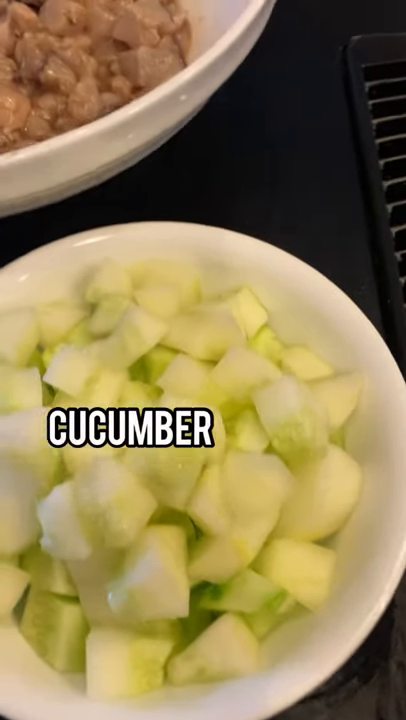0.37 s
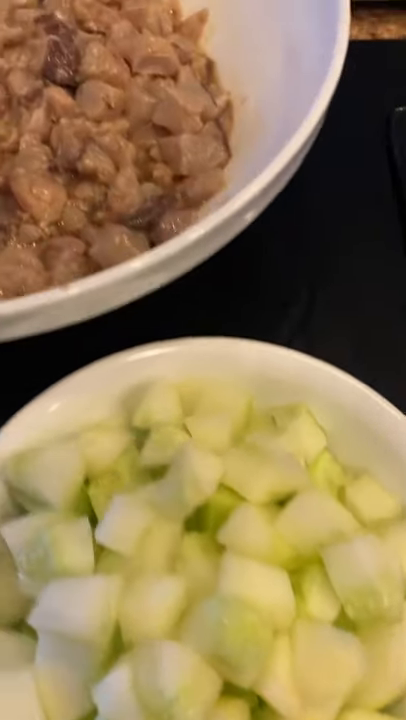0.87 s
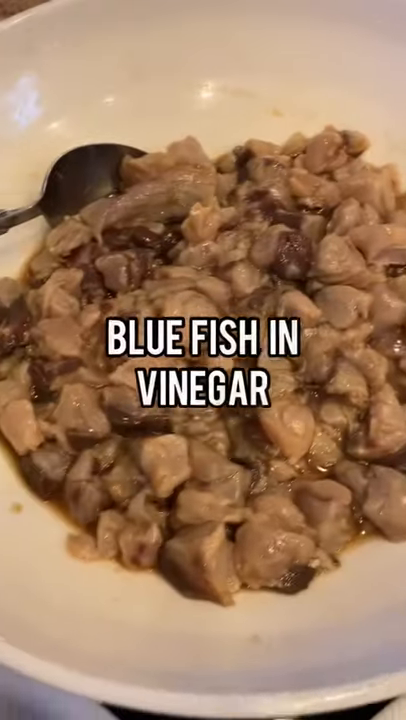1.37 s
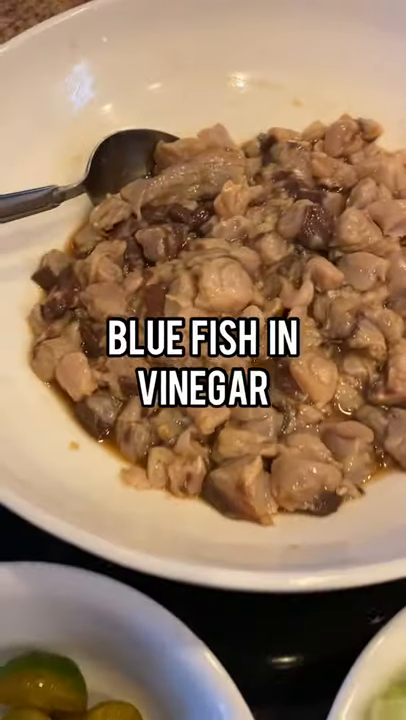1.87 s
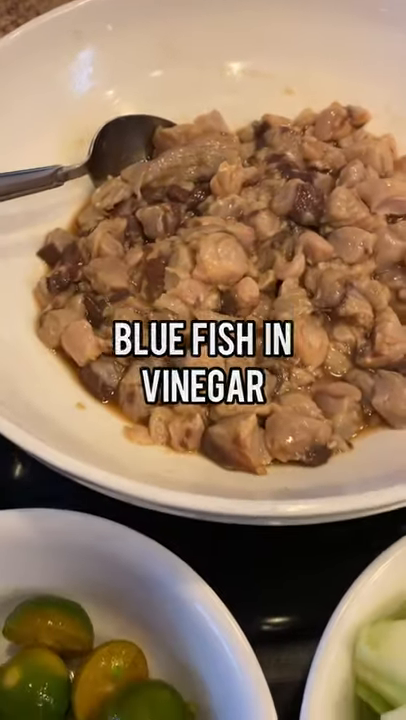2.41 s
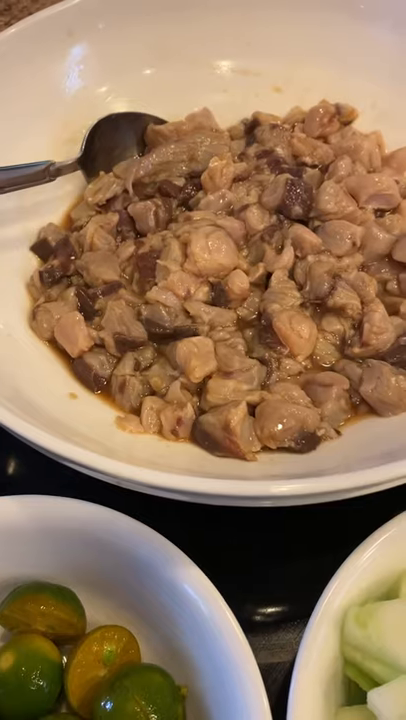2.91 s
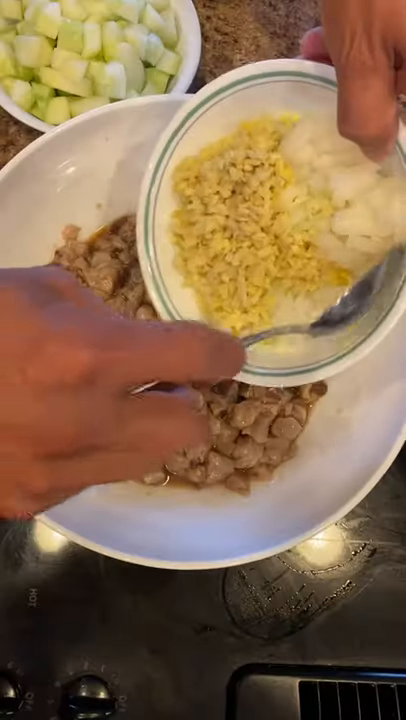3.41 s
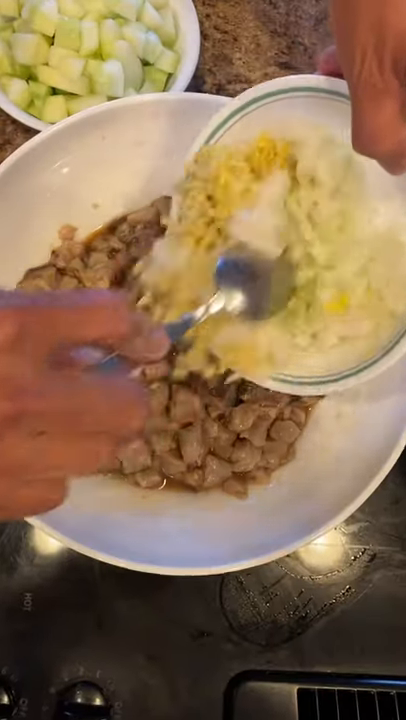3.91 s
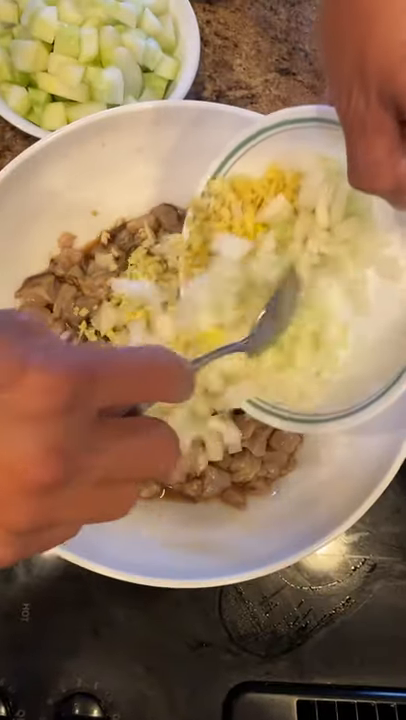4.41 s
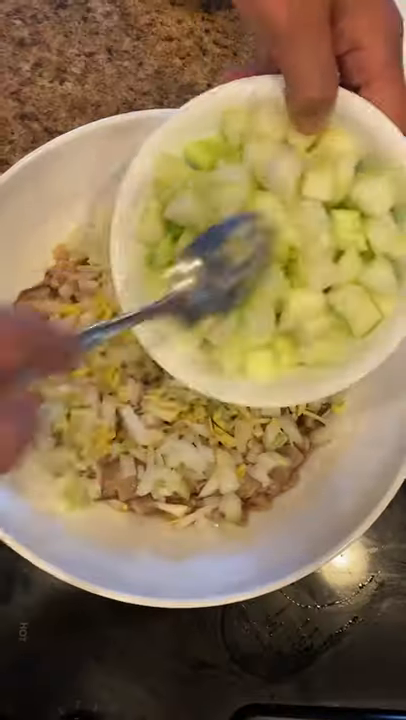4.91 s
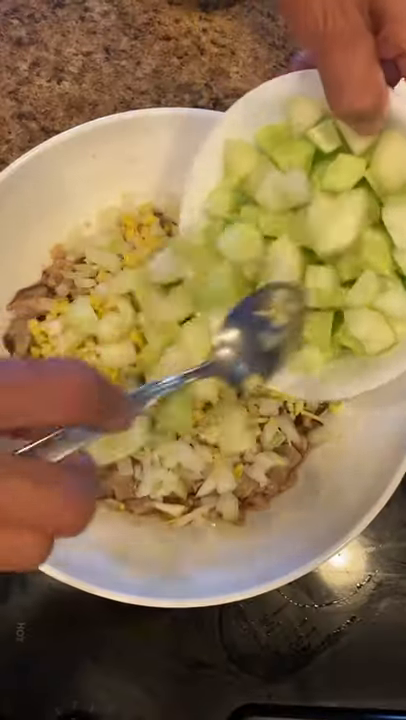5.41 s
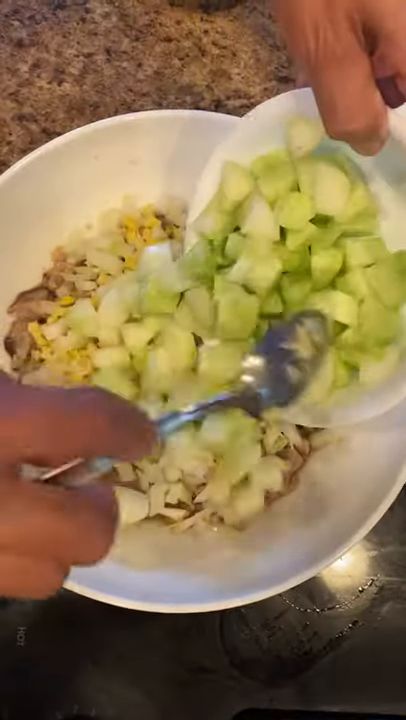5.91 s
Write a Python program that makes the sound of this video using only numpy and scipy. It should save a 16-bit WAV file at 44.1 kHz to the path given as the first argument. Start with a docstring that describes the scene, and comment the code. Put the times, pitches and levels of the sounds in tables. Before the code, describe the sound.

Over a faint constant hum, soft thumps and brushing give way to a few bright, short steel-on-ceramic clacks amid fine wet crackling.

```python
"""A steel spoon knocks a hand-held dish, ringing its many pitches, and bits of food tick as short noise bursts.
This is a quiet kitchen in four joined shots, with a mains buzz of many overtones over noisy room rumble.
Early on come a step of low ringing bumps, a squeak of wavering high tones and a shuffle of grainy noise.
Two microphone ports a few centimetres apart pick it all up."""
import sys
import numpy as np
from scipy import signal
from scipy.fft import rfft, irfft
from scipy.io import wavfile
from scipy.ndimage import uniform_filter1d

SR = 44100
rng = np.random.default_rng(int(sys.argv[2]) if len(sys.argv) > 2 else 0)


def transcribe(u):
    """Save the signal u as a 16-bit wav file named by the first command-line argument.

    u: samples, shape (n,) or (channels, n), limited to [-1, 1]; the rate is SR.
    q: integer samples, one column per channel.
    """
    v = np.clip(np.atleast_2d(u).T, -1, 1)
    q = np.round(v * 32767).astype(np.int16)
    wavfile.write(sys.argv[1], SR, q)


N = 266364
HZ, T = np.fft.rfftfreq(N, 1 / SR), np.arange(N) / SR

# The joined shots. Each row: start in seconds, then changes to the rumble, air and treble in dB,
# and the average number of crackles per second.
SHOTS = [(0, 1, 0.74, 3.5, 1), (1.034, 0, .13, 6, 1), (3.025, .11, 1.5, 6, 42.5), (4.91, -1.3, -0.4, 6, 46)]
# Where each shot stands: 0 is by the counter, 1 and 2 are over the bowl.
SHOT_PLACES = [0, 0, 1, 2]
# Mains overtones that stand out. Each row: multiple of the mains pitch, then level in dB at places 0, 1, 2.
STRONG_OVERTONES = [(10, -70, -65, -67), (13, -85, -79, -79), (17, -85, -79, -83), (19, -70, -70, -73),
                    (20, -76, -83, -84), (22, -75, -89, -94), (24, -76, -77, -78), (26, -79, -81, -82),
                    (27, -78, -87, -88), (30, -82, -80, -82), (31, -78, -84, -87), (32, -76, -81, -84),
                    (42, -77, -87, -93), (44, -75, -91, -93), (46, -86, -78, -86), (51, -81, -84, -89),
                    (54, -78, -81, -96), (58, -86, -81, -83), (71, -80, -80, -81), (85, -82, -80, -84),
                    (87, -79, -80, -79), (89, -82, -84, -83), (94, -91, -79, -86), (109, -81, -92, -92)]
# Basic level of each weak overtone. Each row: frequency in Hz, level in dB.
WEAK_OVERTONES = [(400, -88.5), (1300, -89.5), (2500, -86), (4000, -89), (4600, -93.5), (6000, -89),
                  (7000, -100), (8300, -104), (13000, -112)]
# Change to the weak overtones at places 0, 1, 2, in dB.
WEAK_PLACE_DB = [-2.5, -2.5, -5]
# Resonances that lift the weak overtones. Each row: centre in Hz, width in Hz, lift in dB.
HOUSING = [(1810, 110, 20), (3360, 240, 4.5), (5400, 280, 10.5), (6410, 360, 8), (9500, 195, 4),
           (10300, 500, 1)]
# Room and motor boom. Each row: centre in Hz, width in Hz, relative strength in dB.
RUMBLE_PEAKS = [(56.6, 6.3, 1), (68, 31, -8.5), (122.5, 13.6, -4), (187.6, 4.5, 2), (232.4, 87, -7)]
# Colour of the air noise. Each row: frequency in Hz, relative level per Hz in dB.
AIR_COLOUR = [(40, -30.5), (60, -2), (150, -1.5), (300, -3), (700, -7), (1500, -15), (3000, -22.5),
              (5300, -21.5), (6600, -25.5), (7100, -44), (8000, -42), (8600, -31.5), (10000, -31.5),
              (13000, -38.5), (15600, -46.5), (16400, -67)]
# Small dry ticks. Each row: start in seconds, peak level in dB, rough centre in Hz.
TICKS = [(.205, -49, 5140), (.2155, -47, 8000), (1.193, -43.5, 3550), (1.918, -39.5, 5000),
         (3.751, -44, 875), (3.830, -44.5, 11400), (3.852, -46.5, 9000), (4.024, -51, 11100),
         (4.202, -45, 10000), (4.763, -43, 9600), (5.022, -51, 11000), (5.044, -50, 7600),
         (5.168, -45, 6660), (5.301, -52, 1520), (5.672, -50, 8100), (5.7235, -50, 10000),
         (5.743, -47, 5160), (5.803, -48, 1010), (5.947, -51, 1660), (6.028, -52, 1290)]
# Brushing strokes. Each row: loudest moment in seconds, level there in dB,
# then seconds to rise and seconds to fall, each over 20 dB.
BRUSH_STROKES = [(0.207, -47.5, 0.008, 0.019), (.236, -53.5, 0.013, .03), (.29, -58.5, 0.076, 0.11),
                 (.45, -65, .1, 0.22), (.825, -59, 0.062, 0.19), (.985, -53, 0.078, 0.14)]
# Colour of the brushing. Each row: frequency in Hz, relative level per Hz in dB.
BRUSH_COLOUR = [(300, 17), (1200, 14), (3000, 8), (6000, 1.5), (11000, 4.5), (15000, -4)]
# Soft low bumps. Each row: start in seconds, peak level in dB, settled pitch in Hz,
# seconds for the main tone to fall 60 dB.
THUDS = [(0.211, -33.5, 120.8, 0.14), (0.299, -43, 69.2, 0.86), (0.497, -51.5, 126, 0.3),
         (0.781, -46.5, 122.7, 0.24), (1.05, -36.5, 126.5, 0.14), (1.919, -45.5, 192, 0.055),
         (4.264, -32, 268, 0.01), (4.579, -25.5, 233, 0.014), (4.86, -44.5, 189, 0.064),
         (5.951, -44.5, 331.5, 0.12)]
# Thin squeaks. Each row: loudest moment in seconds, level there in dB, middle pitch in Hz,
# then seconds to rise and seconds to fall, each over 20 dB.
SQUEAKS = [(.43, -72, 11250, .05, .04), (.485, -57, 10070, .08, 0.05), (.552, -61, 10100, 0.063, .03),
           (.615, -62, 10100, 0.041, 0.056), (.8, -76, 10100, .08, .03), (.445, -68, 14000, .07, .03),
           (.498, -77, 14100, .03, .03)]
# Pitches (modes) of dish and spoon together. Each row: pitch in Hz, seconds to fall 60 dB before damping,
# then relative strength in dB when struck at the rim, at the wall, at the bottom.
DISH_MODES = [(683, 0.03, -32, -25, -18), (1000, 0.04, -31.5, -11.5, -25), (1076, 0.087, -10, 3, 9),
              (1530, .03, -35, -21, -14), (1850, 0.1, -31, -18.5, -12), (1940, 0.16, -14.5, -20, 2),
              (2182, 0.082, -16, -8, -1), (2365, 0.077, -40, -21.5, -10), (2360, 0.085, -13, -3.5, -8),
              (2630, 0.093, -34, -9, -26), (2834, 0.078, -31, -3.5, -11), (3002, 0.34, -12, -5, -35),
              (3130, 0.053, -2.5, -5.5, -17), (3200, 0.095, -32, 7, -32), (3510, 0.064, -30, -2, -11),
              (3680, 0.035, -32, -9.5, 11), (4090, 0.037, -24.5, -10.5, 10), (4456, 0.035, 2.5, -18, -11),
              (4540, .09, -8.5, -18, -15), (4740, .04, -2, -24, -6), (4750, 0.15, 2, -16.5, -14),
              (5133, 0.038, 4.5, -2.5, -14), (5390, .08, -10.5, -12, -28), (5483, 0.014, -17, 8, -8),
              (5650, 0.05, -6, -5, -24), (5684, 0.15, -6, -3, -20), (6240, 0.045, -27, 2.5, -4),
              (6800, 0.11, -8, -10.5, -7), (7600, 0.06, -3, -32, -4), (8170, 0.027, -4, -11.5, -10),
              (9185, 0.066, -11.5, -12, -32), (10000, 0.0304, -33, -16, -1), (9975, 0.096, -14, -25.5, -18),
              (9950, 0.035, -13, -11, -8.5), (9900, 0.13, -9.5, -4, -20), (10400, 0.097, -19, -14, -17.5),
              (10935, 0.063, -8.5, -10, -25), (11230, .09, -14, -26, -28), (11340, .1, -7, -24, -31),
              (12200, 0.043, -14, -15, -31), (12830, .04, -19, -8, -23.5), (13400, 0.064, -3, -9, -19),
              (14300, 0.034, -12, -7, -23)]
# Spoon on dish. Each row: start in seconds, level of the first 10 ms in dB before the bass is cut,
# spot (0 is the rim, 1 the wall, 2 the bottom), brightness in dB per octave.
KNOCKS = [(3.3655, -20, 0.045, 1.5), (3.568, -45.5, 0.071, -2), (3.599, -48, 0.42, -1),
          (3.6224, -51, 1.08, -1), (3.72, -60, 0.36, 0), (3.962, -58.5, 0.13, -4),
          (4.2644, -19, 1.216, 1.7), (4.579, -16.5, 1.503, 2.2)]
# How long the room rings. Each row: frequency in Hz, seconds to fall 60 dB.
ROOM_RING = [(200, 0.375), (1000, 0.36), (3000, 0.48), (6000, 0.41), (12000, 0.32)]
# Colour of the room's answer. Each row: frequency in Hz, relative level in dB.
ROOM_COLOUR = [(300, 4), (1000, 0), (2700, 3), (6000, -4.5), (10500, 0.5), (15000, -4)]
# How far the left port is ahead. Each row: frequency in Hz, lead in radians.
PORT_LEAD = [(0, 0), (1810, 0.1), (2500, 1.2), (3270, 0.4), (4130, 1.0), (5170, 0.4), (9130, 5.3),
             (11500, 6.8), (12400, 8.5), (14400, 10.6), (15300, 12.6)]
# Level difference of the ports. Each row: frequency in Hz, left minus right in dB.
PORT_TILT = [(60, -1.0), (150, -3.5), (380, -5.0), (950, -1.0), (2380, -1.0), (5980, 0.5), (15000, 0.0)]
# Diffuse sound at the ports. Each row: frequency in Hz, likeness of the two ports (1 is the same).
PORT_LIKENESS = [(60, 1), (300, 0.92), (640, 0.077), (1400, 0.27), (3000, 0.33), (8000, 1), (15000, 0.93)]

IN_FIRST_SHOT = T < SHOTS[1][0]
MAINS_HZ = 59.98
FIRST_BUZZ_DB = -2  # the buzz is a little softer in the first shot
SCATTER_DB = 5  # random spread of the weak overtones
DRIFT_S = 2  # seconds in which the weak overtones change over
RUMBLE_DB, AIR_DB = -57.5, -61.5  # before the changes of each shot
BURST_SAMPLES = 800  # length of a noise burst
TICK_MS, TICK_CYCLES = 0.85, 4.5  # a tick dies over a short moment plus a few cycles of its centre
WAVER_HZ = 45.5  # typical pitch waver of the squeaks
CHATTER_MS, CHATTER_MS_PER_DB, HARD_DB = 2.66, -0.13, -17  # softer knocks chatter longer
DAMPING_RIM, DAMPING_PER_SPOT = 2.76, 1.205  # hand and food shorten the ring, more so towards the bottom
SOFT_DAMPING_PER_DB = 0.4  # soft knocks are muffled by food
LOW_HZ, HIGH_HZ = 45, 15900  # band of the microphone chain


def gain_of(db):
    """Decibels to gain."""
    return 10 ** (np.asarray(db) / 20)


def evened(x):
    """Scales to an rms (average strength) of 1."""
    return x / np.sqrt(np.mean(x ** 2) + 1e-20)


def read(points, hz):
    """Reads a table between its points, on a log frequency axis."""
    f, value = np.transpose(points)
    return np.interp(np.log(hz + 1), np.log(f + 1), value)


def add(mix, s, sound):
    """Mixes a sound in at s seconds."""
    part = mix[round(s * SR):][:len(sound)]
    part += sound[:len(part)]


def noise(gain):
    """Two unrelated noises of one colour."""
    return evened(irfft(rfft(rng.standard_normal((2, N))) * gain, N))


def by_shot(values):
    """One value per shot, held through each."""
    starts = [row[0] for row in SHOTS]
    return np.asarray(values)[np.searchsorted(starts, T, "right") - 1]


def column(order):
    """One column of the shots over time."""
    return by_shot(np.transpose(SHOTS)[order])


def stroke(s, db, rise, fall):
    """Gain that swells to a top and dies away."""
    return gain_of(db - 20 * np.where(T < s, (s - T) / rise, (T - s) / fall))


def ports(first, second=0):
    """Left and right ports; a second, unrelated signal makes the sound diffuse."""
    left = right = rfft(first)
    if not np.isscalar(second):
        same = np.clip(read(PORT_LIKENESS, HZ), 0, 1)
        right = same * left + np.sqrt(1 - same ** 2) * rfft(second)
    lead = np.interp(HZ, *np.transpose(PORT_LEAD))
    half = gain_of(read(PORT_TILT, HZ) / 2) * np.exp(0.5j * lead)  # each port takes half the difference
    return irfft(np.array([left * half, right / half]), N)


def buzz():
    """Mains overtones, only loosely in step, hum and buzz; weak ones change as the microphone drifts."""
    k = np.arange(8, 220)  # multiples of the mains pitch
    hz = k * MAINS_HZ
    lift = sum(db / (1 + (2 * (hz - f) / w) ** 4) for f, w, db in HOUSING)
    # levels before and after the drift, at each place, for each overtone
    scatter = SCATTER_DB * rng.standard_normal((2, 3, len(k)))
    db = read(WEAK_OVERTONES, hz) + lift + scatter + np.array(WEAK_PLACE_DB)[:, None]
    for multiple, *at_places in STRONG_OVERTONES:
        db[..., multiple - k[0]] = at_places
    # the phase wanders from one overtone to the next
    phase = np.cumsum(1.3 * rng.standard_normal((3, len(k))), axis=1)
    cycle = np.linspace(0, 1, 4096)
    tones = np.cos(2 * np.pi * k[:, None] * cycle + phase[..., None])
    waves = np.sqrt(2) * np.einsum("vpk,pkc->pvc", gain_of(db), tones)
    place = by_shot(SHOT_PLACES)
    moved = np.clip((T - column(order=0)) / DRIFT_S, 0, 1)
    out = np.zeros(N)
    for n, pair in enumerate(waves):
        before, after = [np.interp(MAINS_HZ * T % 1, cycle, wave) for wave in pair]
        out += (place == n) * ((1 - moved) * before + moved * after)
    return ports(gain_of(FIRST_BUZZ_DB * IN_FIRST_SHOT) * out)


def floor():
    """Booming rumble and a soft wide air noise whose treble differs between shots."""
    boom = np.sqrt(sum(gain_of(2 * db) / (1 + (2 * (HZ - f) / w) ** 2) ** 2 for f, w, db in RUMBLE_PEAKS))
    rumble = noise(boom) * gain_of(RUMBLE_DB + column(order=1))
    air = noise(gain_of(read(AIR_COLOUR, HZ)))
    treble = irfft(rfft(air) / (1 + (7000 / (HZ + 1)) ** 6), N)  # mostly above 7000 Hz
    air = air + treble * (gain_of(column(order=3)) - 1)
    return ports(*(rumble + air * gain_of(AIR_DB + column(order=2))))


def ticks():
    """Very short bursts of noise with a broad centre, and a faint random crackle of wet food."""
    out, ms = np.zeros(N), 1000 * np.arange(BURST_SAMPLES) / SR
    for s, db, hz in TICKS:
        band = signal.butter(2, [hz / 1.78, min(hz * 1.38, SR / 2.5)], "band", fs=SR)
        fall_ms = TICK_MS + 1000 * TICK_CYCLES / hz
        burst = rng.standard_normal(BURST_SAMPLES) * np.exp(-ms / fall_ms)
        sound = signal.lfilter(*band, burst)
        add(out, s, gain_of(db) * sound / abs(sound).max())
    # the crackle repeats one tiny pop at random moments
    pops = (rng.random(N) < column(order=4) / SR) * gain_of(-55 + 1.3 * rng.standard_normal(N))
    pop = np.diff(rng.standard_normal(BURST_SAMPLES) * np.exp(-ms / 0.6), 2)
    return out + signal.oaconvolve(pops, pop / abs(pop).max())[:N]


def shuffle():
    """Cloth or a sole brushing past: wide grainy noise, until the first shot ends."""
    grain = gain_of(3.3 * evened(uniform_filter1d(rng.standard_normal(N), 200)))
    strokes = np.sqrt(sum(stroke(*row) ** 2 for row in BRUSH_STROKES)) * IN_FIRST_SHOT
    return noise(gain_of(read(BRUSH_COLOUR, HZ))) * evened(grain) * strokes


def thuds():
    """A soft push rings a low panel: pitch sags, with one lower and two shorter higher partners."""
    out, t = np.zeros(N), np.arange(SR // 2) / SR
    for s, db, hz, t60 in THUDS:
        turns = 2 * np.pi * hz * (t + 0.0026 * (1 - np.exp(-t / 0.006)))
        sound = np.sin(turns) + 0.36 * np.sin(0.59 * turns)
        sound += 0.5 * np.sin(1.6 * turns) * np.exp(-t / 0.11)
        sound += (90 / hz) ** 2 * np.sin(2.3 * turns) * np.exp(-t / 0.029)  # stronger on deep bumps
        sound *= (1 - np.exp(-t / 0.01)) * gain_of(-60 * t / t60)
        add(out, s, gain_of(db) * sound / abs(sound).max())
    return out


def squeaks():
    """Thin high tones that catch and slip, wavering in pitch."""
    slips, waver = uniform_filter1d(uniform_filter1d(rng.standard_normal((2, N)), 200), 200)
    turns = np.cumsum(WAVER_HZ * evened(waver)) / SR
    tones = np.zeros(N)
    for s, db, hz, rise, fall in SQUEAKS:
        tones += stroke(s, db, rise, fall) * np.sin(2 * np.pi * (hz * T + turns))
    return np.sqrt(2) * evened(gain_of(2.7 * evened(slips))) * tones


def knocks():
    """The spoon edge chatters for a few ms and rings the modes; the spot struck sets their strengths."""
    out, t = np.zeros(N), np.arange(SR // 3) / SR
    hz, t60, *spots = np.transpose(DISH_MODES)
    short_t = t[:BURST_SAMPLES]
    for s, db, spot, bright_db in KNOCKS:
        ms = max(CHATTER_MS + CHATTER_MS_PER_DB * (db - HARD_DB), 0.5)
        damping = DAMPING_RIM + DAMPING_PER_SPOT * spot + SOFT_DAMPING_PER_DB * max(HARD_DB - db, 0)
        u = 1000 * short_t / ms
        contact = rng.standard_normal(BURST_SAMPLES) * np.exp(-u) * (1 - np.exp(-5 * u))
        spectrum = rfft(contact)
        contact = irfft(spectrum / abs(spectrum)) * np.exp(-u / 3)  # hard steel feeds all pitches evenly
        contact /= np.linalg.norm(contact)
        contact[40] += 0.45  # the main blow among the chatter
        # how hard the chatter feeds each mode
        drive = abs(np.exp(2j * np.pi * hz[:, None] * short_t) @ contact)
        level_db = np.array([np.interp(spot, range(len(spots)), mode) for mode in np.transpose(spots)])
        level = gain_of(level_db + bright_db * np.log2(hz / 3000)) / (drive + 0.13)
        level *= (-1) ** np.arange(len(hz))  # every other mode starts the opposite way
        fall = gain_of(-60 * damping * t / t60[:, None])
        ring = level @ (fall * np.sin(2 * np.pi * hz[:, None] * t))
        sound = signal.fftconvolve(ring, contact)[:len(t)]
        # the bright crack of steel on glaze
        add(sound, 0, 0.74 * gain_of(2 * bright_db) * np.diff(contact))
        add(out, s, gain_of(db) * sound / np.std(sound[:SR // 100]))
    return signal.lfilter(*signal.butter(2, 450, "high", fs=SR), out)  # the knocks carry little bass


def room(x):
    """A dense tail of echoes, each band dying at its own speed."""
    hz, t, z = signal.stft(rng.standard_normal((2, SR // 2)), SR, nperseg=256)
    db = read(ROOM_COLOUR, hz)[:, None] - 60 * t / read(ROOM_RING, hz)[:, None]
    tail = signal.istft(z * gain_of(db), SR, nperseg=256)[1]
    tail *= 1 - np.exp(-(np.arange(tail.shape[1]) / SR / 0.0072) ** 2)  # the walls answer after a few ms
    tail /= np.linalg.norm(tail[0])
    return ports(*signal.fftconvolve(x[None], tail, axes=1)[:, :N])


def scene():
    """All sources at the two ports; the room answers the near ones."""
    near = knocks() + ticks() + thuds() + squeaks()
    return ports(near) + gain_of(-15) * room(near) + ports(*shuffle()) + floor() + buzz()


def top_cut(x):
    """Nothing passes above the cut-off."""
    return signal.sosfilt(signal.butter(12, 17100, fs=SR, output="sos"), x)


def record(dry):
    """Later shots fade in quickly after each join; the band ends gently below and steeply above."""
    since_join = T - column(order=0)
    fade = np.where(IN_FIRST_SHOT, 1, 0.13 + 0.85 * np.clip(since_join / 0.027, 0, 1))
    band = signal.sosfilt(signal.butter(2, LOW_HZ, "high", fs=SR, output="sos"), dry * fade)
    band = signal.sosfilt(signal.butter(16, HIGH_HZ, fs=SR, output="sos"), band)
    return top_cut(band)


dry = scene()
out = record(dry)
transcribe(out)
```